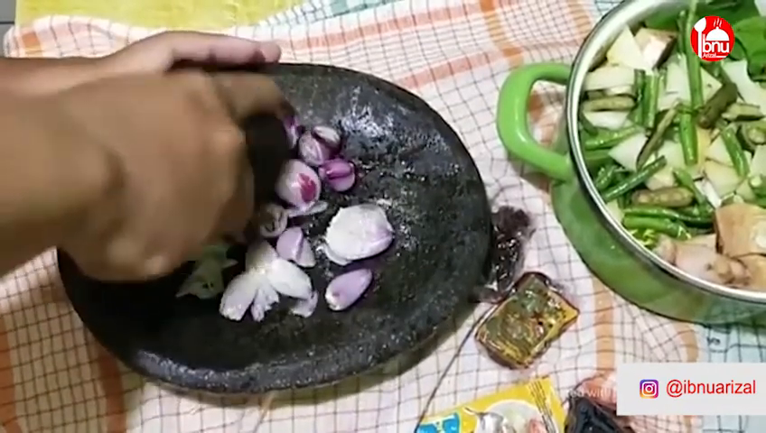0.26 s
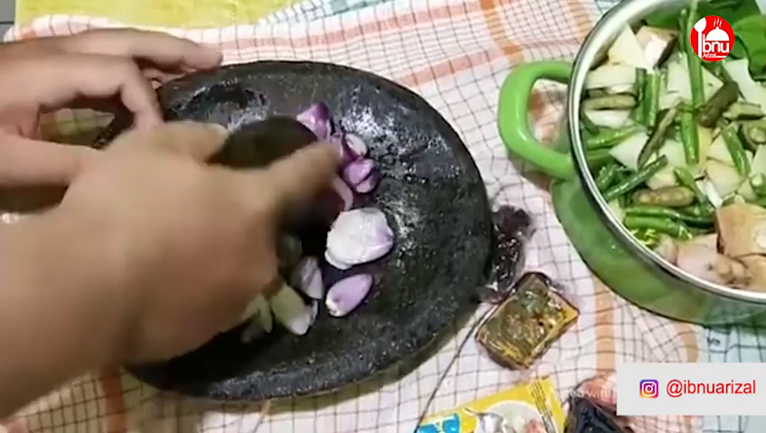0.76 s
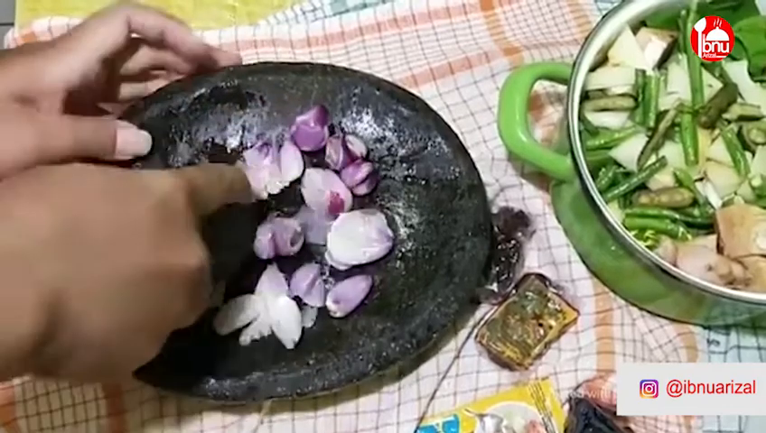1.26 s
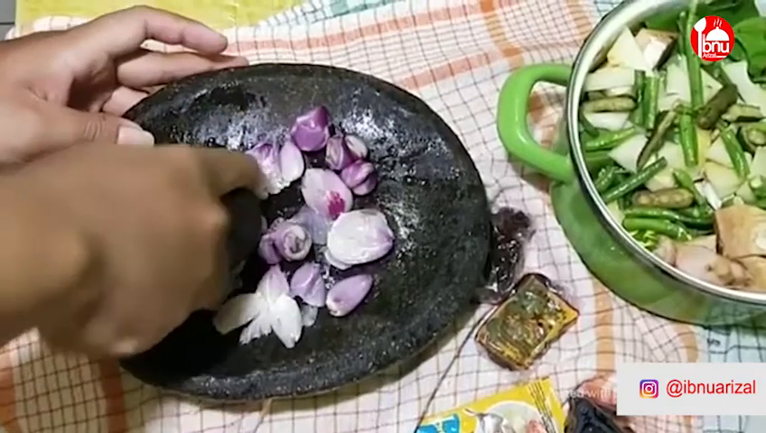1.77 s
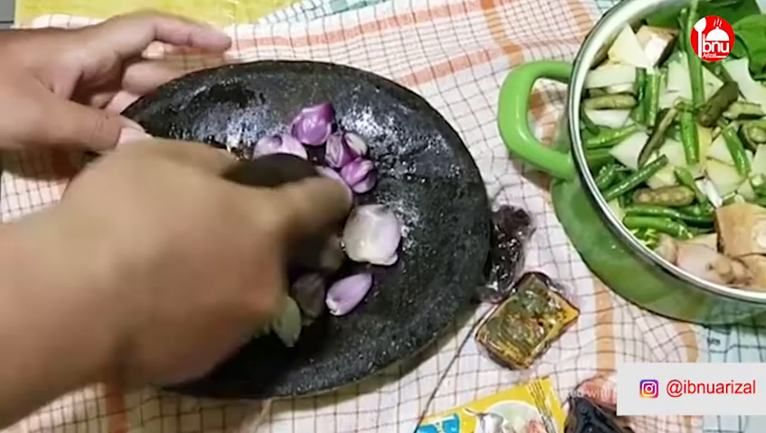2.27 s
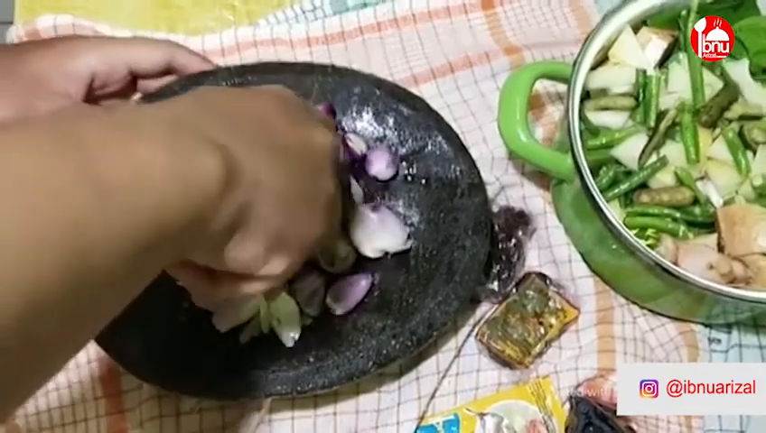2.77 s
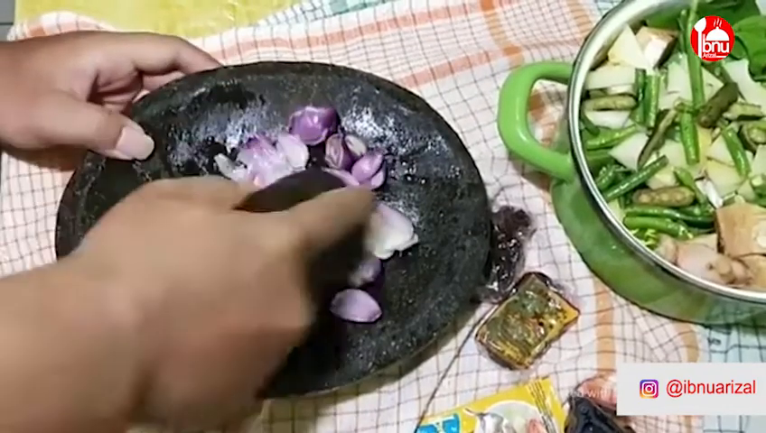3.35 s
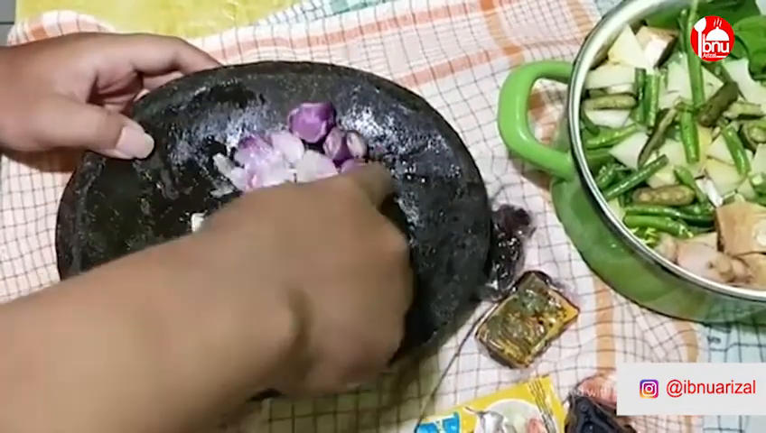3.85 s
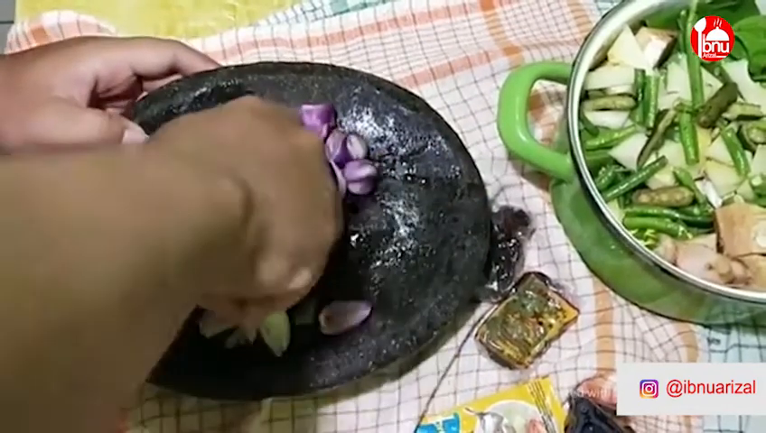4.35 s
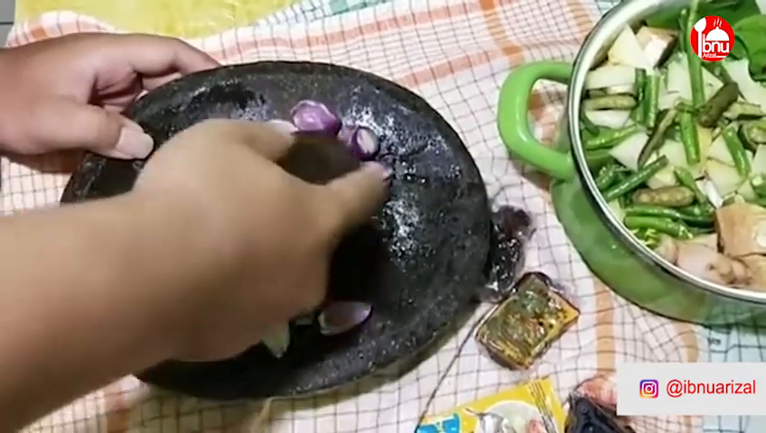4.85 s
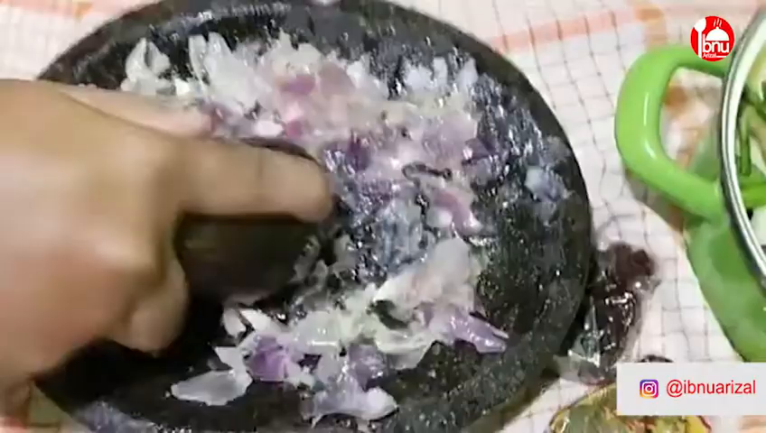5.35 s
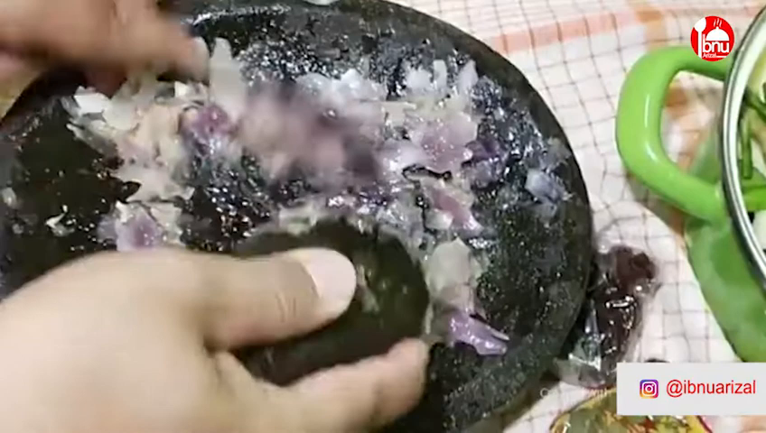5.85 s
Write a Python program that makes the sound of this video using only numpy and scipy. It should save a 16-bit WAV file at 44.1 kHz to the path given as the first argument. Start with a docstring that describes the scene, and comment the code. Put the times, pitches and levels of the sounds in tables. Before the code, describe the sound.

Five uneven pestle strokes, heard near the mortar in a small, slightly echoing room with somewhat dulled treble. Shallots snap and crackle most densely at the start, stone rubs on stone, and low thumps shake the table. The third stroke squeaks and bursts sharply, followed by a lone bright knock; the fourth ends in a juicy crack. The last is a rough scrape with thin bird chirps and a spoon gathering pulp.

```python
"""A hand crushes shallots with a stone pestle in a shallow stone mortar on a cloth-covered table.
Five strokes follow one another in a quiet, softly humming kitchen: bulbs crackle, split and now and then
squeak (shaped noise), the pestle knocks (ringing modes) and drags (streams of tiny slips), and the table
booms (low sine swells). In the last stroke a far bird chirps (sliding sines), the sound cuts out for a moment,
and a spoon scrapes the pulp together (slips that ring its modes)."""
import sys
import numpy as np
from scipy import signal
from scipy.io import wavfile
from scipy.ndimage import uniform_filter1d

SR = 44100
rng = np.random.default_rng(int(sys.argv[2]) if len(sys.argv) > 2 else 0)


def persist_wave(psi):
    """Save psi, clipped to +-1, as 16-bit WAV."""
    counts = np.round(np.clip(psi, -1, 1) * 32767).astype(np.int16)
    wavfile.write(sys.argv[1], SR, np.atleast_2d(counts).T)


N = 269451

# ringing tones of mortar and table: (pitch_hz, relative_db, free_ring_t60_s)
BODY_MODES = [(97.6, -4.5, 0.35), (105.6, -11, 0.38), (140, -16, 0.55), (164, -18.5, 0.25),
              (224.7, 8, 0.12), (296.3, 4.5, 0.079), (323.7, -5.5, 0.18), (436, -0.5, 0.13),
              (497, -12.5, 0.2), (544, -21.5, 0.058), (654, -21.5, 0.12), (738, -7.5, 0.11),
              (819, -13, 0.1), (938, -11, 0.092), (1073, -12, 0.086), (1160, -9.5, 0.082),
              (1253, -20.5, 0.16), (1280, -15, 0.033), (1365, -31.5, 0.3), (1713, -19.5, 0.1),
              (1800, -16, 0.17), (1950, -26, 0.05), (2030, -20.5, 0.033), (2230, -24, 0.16),
              (2300, -26, 0.064), (2590, -29, 0.13)]
# ringing tones of the pestle: (pitch_hz, relative_db, ring_t60_s before the hand changes it)
PESTLE_MODES = [(3007, -2.5, 0.088), (3020, -30.5, 0.23), (5280, -3, 0.058), (6540, -12.5, 0.11),
                (7000, -14, 0.17)]


def gain_of(db):
    """Turn decibels into a multiplier."""
    return 10 ** (np.asarray(db) / 20)


def evened(x):
    """Scale x to an average strength (RMS) of one."""
    return x / np.sqrt(np.mean(x ** 2) + 1e-20)


def read(points, hz):
    """Look up a curve of (pitch_hz, value) points, straight between points on a log pitch scale."""
    f, value = np.transpose(points)
    return np.interp(np.log(hz + 1), np.log(f + 1), value)


def add(mix, s, sound):
    """Lay a sound into the mix at s seconds, cut off at the end of the mix."""
    part = mix[round(s * SR):][:len(sound)]
    part += sound[:len(part)]


def band(x, lo_hz, hi_hz):
    """Keep only the pitches between two limits, at a strength of one."""
    return evened(signal.sosfilt(signal.butter(3, [lo_hz, hi_hz], "band", fs=SR, output="sos"), x))


def steadied(x, lo_hz, hi_hz, hold_s):
    """A band of x with its beats evened out: the pitch wavers, the strength stays nearly steady."""
    x = band(x, lo_hz, hi_hz)
    power = abs(uniform_filter1d(x ** 2, round(hold_s * SR)))
    return band(x / np.sqrt(power + 0.046), lo_hz, hi_hz)


def colour(x, points):
    """Filter x to the given spectrum without sounding ahead of time (minimum phase)."""
    log_gain = np.log(gain_of(read(points, abs(np.fft.fftfreq(4096, 1 / SR)))))
    taps = np.fft.ifft(np.exp(np.conj(signal.hilbert(log_gain)))).real
    return signal.oaconvolve(x, taps[:2048])[:len(x)]


def stroke(column, shares=None):
    """Loudness curve of one column of the strokes, silent between them, each scaled by its share."""
    # five strokes of the hand, each a list of (time_s, crunch_of_flesh_db, drag_of_pestle_db,
    # load_that_shakes_mortar_and_table_db), all before the shares
    stroke_rows = [
        [(0.0, -75, -75, -90), (0.142, -62, -66.5, -59.5), (0.222, -60.5, -65.5, -67), (0.258, -66, -81, -64),
         (0.27, -55, -60, -57.5), (0.386, -45.5, -63, -56.5), (0.408, -56, -58, -47.5), (0.48, -55, -58, -62),
         (0.532, -49.5, -56, -55.5), (0.706, -59.5, -56.5, -54), (0.934, -71.5, -82, -78.5),
         (1.0, -102, -77, -97)],
        [(1.33, -79.5, -75, -76), (1.38, -78, -68, -71), (1.426, -75, -56.5, -58), (1.46, -69, -58, -60),
         (1.57, -70.5, -67, -51), (1.704, -66.5, -73, -65), (1.81, -69, -49.5, -45.5), (1.918, -60, -62, -64),
         (1.95, -52, -54.5, -52.5), (2.056, -64.5, -75, -70.5), (2.112, -49, -61, -63), (2.122, -66, -48, -44),
         (2.424, -79.5, -73, -73.5), (2.45, -103, -76, -76)],
        [(2.65, -87, -79, -61), (2.66, -94, -100, -88), (2.77, -69, -62.5, -68), (2.84, -79.5, -68.5, -80),
         (2.918, -66.5, -68, -61.5), (3.004, -71.5, -78, -81), (3.016, -64, -62, -68), (3.112, -64, -91, -72),
         (3.162, -51, -49, -39), (3.354, -86, -67.5, -63), (3.388, -73, -111, -60.5), (3.55, -91, -101, -109)],
        [(4.2, -99, -85, -79), (4.214, -102, -98, -89), (4.266, -70, -86, -66), (4.292, -76, -76, -66),
         (4.304, -75, -53, -49.5), (4.35, -73, -50.5, -50), (4.435, -70, -57.5, -55.5), (4.47, -61, -63, -57),
         (4.566, -61.5, -73, -63), (4.582, -48, -75, -59), (4.618, -64, -62.5, -49), (4.672, -73, -48.5, -41),
         (4.85, -64, -82, -68), (4.958, -70, -74.5, -79), (5.076, -101, -77, -91), (5.1, -92.5, -99, -92)],
        [(5.3, -86.5, -86, -68), (5.382, -79.5, -76.5, -70), (5.552, -71, -53, -54.5), (5.566, -74, -44.5, -54),
         (5.6, -67, -41, -50), (5.63, -66.5, -36.5, -46), (5.676, -68.5, -53.5, -48.5), (5.778, -86, -62, -59),
         (5.906, -96, -69.5, -61.5), (5.938, -94, -70, -77), (5.97, -101, -72, -58), (6.036, -72, -70, -86),
         (6.11, -78, -67, -73)],
    ]
    t, out = np.arange(N) / SR, np.zeros(N)
    for k, rows in enumerate(stroke_rows):
        rows = np.transpose(rows)
        gain = gain_of(np.interp(t, rows[0], rows[column], left=-200, right=-200))
        out += gain * (1 if shares is None else shares[k])
    return out


def grit(per_s, spread_db, smooth):
    """Clicks of uneven size at random moments, over a share of smooth noise."""
    size = gain_of(spread_db * np.minimum(rng.exponential(1, N), 4)) * rng.standard_normal(N)
    happens = rng.random(N) < per_s / SR
    return evened(size * happens) + smooth * rng.standard_normal(N)


def ring(modes, hard_hz, rise_ms=1., place_db=0., steep=3., wobble_db=0.):
    """All modes after a blow; a soft blow wakes only the low ones, the place struck weights them."""
    t = np.arange(SR // 3) / SR
    hz, db, t60 = np.transpose(modes)[:, :, None]
    place, phase = rng.random((2, len(modes), 1))
    softness = np.sqrt(1 + (hz / hard_hz) ** (2 * steep))
    weight = gain_of(db + place_db * (place - .5)) / softness
    rise_s = rise_ms / 1000 * 300 / hz + 1e-4  # bass swells more slowly
    rise = 1 - np.exp(-t / rise_s)
    # uneven dying: one random value per 100 samples, smoothed, only above 500 Hz
    wobble = evened(uniform_filter1d(rng.standard_normal((len(modes), 221)), size=4))
    wobble = np.repeat(gain_of(wobble_db * wobble), 100, axis=1)[:, :len(t)]
    wobble = np.where(hz > 500, uniform_filter1d(wobble, size=100), 1)
    fade = gain_of(-60 * t / t60)
    return (weight * rise * wobble * fade * np.sin(2 * np.pi * (hz * t + phase))).sum(0)


def hush():
    """Kitchen hush: random short-time spectra whose narrow patches flicker like faint tones."""
    air_db = -69.5
    # spectrum of the hush: (pitch_hz, relative_db)
    air = [(18, -36), (30, -8), (70, -28.5), (106, 2.5), (178, -29), (210, -0.5), (259, -23), (368, -14),
           (2140, -25), (7570, -37), (8120, -44.5), (10600, -70.5), (17900, -120)]
    frames, hz = N // 256 + 5, np.fft.rfftfreq(1024, 1 / SR)
    a, b, patches = rng.standard_normal((frames, 513, 3)).T
    patches = uniform_filter1d(patches, size=3, axis=0)  # across pitch
    patches = evened(uniform_filter1d(patches, size=12, axis=1))  # across time
    spectra = (a + 1j * b) * gain_of(read(air, hz)[:, None] + 3.5 * patches)
    noise = signal.istft(spectra, nperseg=1024, noverlap=768)[1][:N]
    return gain_of(air_db) * band(noise, 30, 22000)


def hum():
    """A wavering low hum: noise squeezed into narrow bands, with its strength steadied."""
    # bands of the hum: (centre_hz, width_hz, level_db)
    hum_bands = [(106.25, 5.7, -71.5), (214.4, 19, -78), (397, 34, -87), (808, 12, -88)]
    out = np.zeros(N)
    for hz, width, db in hum_bands:
        noise = rng.standard_normal(N)
        out += gain_of(db) * steadied(noise, hz - width / 2, hz + width / 2, 0.048)
    return out


def kitchen(x):
    """Echoes of the room: sparse taps of random sign, each band dying at its own speed."""
    # how long the room rings: (pitch_hz, t60_s)
    room_t60 = [(100, 0.31), (1000, 0.22), (8000, 0.25)]
    taps, starts = np.zeros(SR // 2), np.arange(200, SR // 2 - 20, 20)
    places = starts + rng.integers(0, 20, len(starts))
    taps[places] = rng.choice([-1., 1.], len(starts))
    hz, t, z = signal.stft(taps, SR, nperseg=256)
    fade = gain_of(-60 * t / read(room_t60, hz)[:, None])
    tail = signal.istft(z * fade, SR, nperseg=256)[1]
    return signal.fftconvolve(x, tail / np.linalg.norm(tail))[:N]


def bird():
    """A far bird: thin whistles that slide up and level off."""
    # calls: (start_s, length_s, start_hz, end_hz that the slide nears, level_db)
    chirps = [(5.347, 0.035, 6500, 7400, -73), (5.397, 0.065, 6530, 7500, -68),
              (6.045, 0.049, 6800, 7300, -70)]
    out = np.zeros(N)
    for s, length, from_hz, to_hz, db in chirps:
        u = np.linspace(0, 1, round(length * SR))
        hz = to_hz + (from_hz - to_hz) * np.exp(-3.5 * u)
        swell = np.sin(np.pi * u) ** 0.62
        add(out, s, gain_of(db) * swell * np.sin(2 * np.pi * np.cumsum(hz) / SR))
    return out


def spoon():
    """A spoon scrapes the pulp together: light slips along the stone wake now one mode, now another."""
    # ringing tones of the spoon: (pitch_hz, relative_db, ring_t60_s)
    spoon_modes = [(942, 9, 0.057), (1750, 2, .06), (1806, 10.5, 0.053), (2490, 2.5, 0.095),
                   (2620, 2, 0.067), (3180, -1, 0.018)]
    # loudness of the scrape: (time_s, level_db)
    scoop = [(5.7, -90), (5.77, -77), (5.9, -68.5), (6.02, -73), (6.11, -80)]
    t, out, slips = np.arange(N) / SR, np.zeros(N), grit(400, 4.5, 0.59)
    for mode in spoon_modes:
        touch = gain_of(3.3 * evened(uniform_filter1d(rng.standard_normal(N), size=2000)))
        out += signal.oaconvolve(touch * slips, ring([mode], SR))[:N]
    level_db = np.interp(t, *np.transpose(scoop), left=-200)
    return gain_of(level_db) * evened(out)


def thumps():
    """Weight lands and the table top bobs at a pitch set by the load on it."""
    # weight dropped on the table: (start_s, peak_db, pitch_hz, rise_ms, t60_s)
    thump_rows = [(0.364, -44, 122.6, 11, 0.15), (1.382, -30.5, 90.5, 20, 0.18),
                  (1.515, -36.5, 116, 7.6, 0.087), (2.123, -36.5, 108, 6.4, 0.15),
                  (2.214, -48, 128, 12, 0.21), (2.701, -61.5, 74.6, 6, 0.24),
                  (3.164, -39.5, 108, 8.4, 0.28), (3.874, -35, 101.3, 12, 0.099),
                  (4.248, -50.5, 76, 10, 0.23), (4.658, -63, 118, 4.7, 0.33), (5.456, -46.5, 120, 17, 0.15),
                  (5.592, -34.5, 119, 8, 0.087), (5.689, -41.5, 130, 9.9, 0.2)]
    out, t = np.zeros(N), np.arange(SR // 2) / SR
    for s, db, hz, rise_ms, t60 in thump_rows:
        shape = (1 - np.exp(-t * 1000 / rise_ms)) ** 2 * gain_of(-60 * t / t60)
        add(out, s, gain_of(db) * shape / shape.max() * np.sin(2 * np.pi * hz * t))
    return out


def dragging():
    """Fine slips scrape dully through pulp, brightly on bare stone; duller jolts shake mortar and table."""
    held_share, grip = 0.52, .2  # shares of ring time left: mortar under the pestle, pestle in the hand
    rock_db = -3.5  # part of the load that rocks the table
    # sound of the drag through pulp: (pitch_hz, relative_db)
    pulp = [(300, -19), (600, 1), (850, 2), (1300, -10.5), (2500, -32.5), (6000, -46.5)]
    # sound of the drag on bare stone: (pitch_hz, relative_db)
    stone = [(400, -31), (800, 5.5), (1100, 2), (1700, 1), (2300, -1.5), (2800, -12), (3500, -34.5),
             (9000, -38.5)]
    # per stroke: share of bare stone under the pestle (0-1)
    bare_share = [0.66, 0.32, 0.35, 0.23, 0.57]
    # per stroke, how much the dragged pestle rings: (low_modes_db, high_modes_db)
    sing_db = [(-11, -17), (-20, -18), (-18, -16), (-24, -22), (-11, -17.5)]
    # per stroke: part of the load that shifts the mortar on the cloth (db)
    shift_db = [-3, -5, -5, -3, -8]
    # per stroke: part of the load that drives the strongest mode of the mortar (db)
    roll_db = [1, -1.5, -6, -7, -7]

    held = np.multiply(BODY_MODES, [1, 1, held_share])
    bare = np.array(bare_share)
    body = ring(held, 3900)
    slips = grit(1800, 2.2, 1.1)
    # part of the scrape is heard through the mortar
    drive = slips + 0.47 * band(signal.oaconvolve(slips, body)[:N], 450, 4500)
    scrape = stroke(2, 1 - bare) * evened(colour(drive, pulp))
    scrape += stroke(2, bare) * evened(colour(drive, stone))

    gripped = np.multiply(PESTLE_MODES, [1, 1, grip])
    low_sing = evened(signal.oaconvolve(slips, ring(gripped[:2], SR))[:N])
    high_sing = evened(signal.oaconvolve(slips, ring(gripped[2:], SR))[:N])
    low_share, high_share = gain_of(sing_db).T
    scrape += stroke(2, bare * low_share) * low_sing
    scrape += stroke(2, bare * high_share) * high_sing

    jolts = signal.oaconvolve(grit(300, 4.9, 0.66), ring(held, 380))[:N]
    shifting = stroke(3, gain_of(shift_db)) * steadied(jolts, 272, 580, 0.08)
    rocking = stroke(3) * gain_of(rock_db) * steadied(jolts, 65.4, 163.0, 0.03)
    rolling = stroke(3, gain_of(roll_db)) * steadied(jolts, 177.0, 256.3, 0.13)
    return scrape + rolling + shifting + rocking


def crushing():
    """Cells burst in a dense crackle; splits, squeaks and puffs each add a noise burst, sharp or slow."""
    pop_db = 7  # the first instant of a burst is louder
    rise_share, tearing_db = 0.021, 2  # a burst opens in this share of its t60 and is uneven
    # splits, and a few faint squeaks, scrapes and puffs:
    # (start_s, peak_db, resonance_centre_hz, resonance_against_hiss_db, t60_s)
    burst_rows = [(0.063, -51, 2570, -13, 0.044), (0.127, -41.5, 4230, -15, 0.12),
                  (0.151, -33, 4670, -4.5, 0.021), (0.2717, -28.5, 3860, -0.5, 0.1),
                  (0.2828, -39.5, 4160, -12, 0.24), (0.3344, -33.5, 4030, -2.5, 0.13),
                  (0.362, -38, 2100, -9, 0.37), (0.395, -32.5, 4560, -7.5, 0.1),
                  (0.4077, -26.5, 4340, -8.5, 0.059), (0.4358, -37.5, 1810, -10.5, 0.29),
                  (0.5013, -35.5, 4370, 5, 0.15), (0.538, -42, 2140, 11, 0.03),
                  (0.5645, -29, 4250, -36, 0.049), (0.61, -34, 1240, -10.5, 0.33),
                  (1.3836, -52, 4100, -18, 0.082), (1.5168, -42.5, 3820, -4, 0.13),
                  (1.5742, -41.5, 4230, 6, 0.11), (1.7565, -30.5, 3980, -9, 0.14),
                  (1.9348, -33, 4080, 0, 0.1), (1.9774, -38.5, 4400, -1, 0.054),
                  (2.067, -46, 4800, 10, 0.47), (2.168, -49.5, 2000, 20, 0.057),
                  (2.211, -48.5, 4200, -3, 0.36), (2.8663, -53.5, 2800, -3, 0.22),
                  (2.9063, -55, 2980, -6, 0.045), (3.045, -43, 5560, 33, 0.043),
                  (3.123, -38.5, 5330, 13, 0.53), (3.1418, -31, 2540, 12, 0.031),
                  (3.159, -44, 1496, 2, 0.042), (3.1632, -22, 2640, -7.5, 0.035),
                  (3.166, -29, 2570, -12, 0.033), (4.2971, -52, 1160, -3, 0.25),
                  (4.402, -52.5, 4640, 14, 0.082), (4.4485, -46.5, 4070, -3, 0.11),
                  (4.462, -40, 3830, 3.5, 0.22), (4.5532, -50, 3920, -3, 0.079),
                  (4.5793, -30.5, 1500, -7, 0.12), (4.5889, -26, 2800, -10.5, 0.16),
                  (4.6166, -33, 3000, 0, 0.12), (4.63, -33, 1900, -4, .3), (4.6635, -30, 2600, -3, 0.06),
                  (4.6675, -19, 3800, -4, 0.05), (4.689, -35, 1700, 0, 0.2), (4.873, -52, 4800, 4, 0.32),
                  (4.899, -54.5, 3100, 11, 0.14), (5.47, -45.5, 5070, -0.5, 0.12),
                  (5.493, -50.5, 4800, 26, 0.073), (5.668, -46.5, 7060, -13, 0.13),
                  (5.706, -54, 7300, -3, 0.08)]
    # hiss of breaking flesh: (pitch_hz, relative_db)
    crunch = [(410, -25), (700, -14), (972, -21), (1340, -12.5), (1560, -22), (2680, -6.5), (3230, -10),
              (3840, -3), (5070, -5), (5970, -7), (6890, 6.5), (7560, 3.5), (8120, -20.5), (10600, -55),
              (17900, -120)]
    out = stroke(1) * evened(colour(grit(2000, 2.5, 0.8), crunch))
    t = np.arange(4000) / SR
    for s, db, hz, resonance_db, t60 in burst_rows:
        noise = rng.standard_normal(4000)
        tear = gain_of(tearing_db * evened(uniform_filter1d(rng.standard_normal(4000), size=90)))
        resonance = signal.lfilter(*signal.iirpeak(hz, 3.5, SR), noise)
        burst = evened(colour(noise, crunch)) + gain_of(resonance_db) * evened(resonance)
        opening = np.minimum(t / (rise_share * t60), 1)
        fade = gain_of(pop_db * np.exp(-t / 0.0013) - 60 * t / t60)
        burst = burst * fade * opening * tear
        add(out, s, gain_of(db) * burst / abs(burst).max())
    return out


def knocks():
    """A short clack of contact, then mortar and table ring and the pestle chatters; brief contact is bright."""
    bass_rise_ms = 11  # swell of a 300 Hz mode, longer below and shorter above
    place_db, wobble_db = 5, 6  # the place struck favours some modes; hand and cloth make them die unevenly
    thud_db, thud_t60_s = -17, 0.21  # dull scatter of the blow under the ring, before the hand shortens it
    clack_rise_ms, settle_s = 1.2, .01  # the clack opens; the pestle chatters against the stone
    rattle_db, pestle_soft_hz = -19.5, 3600  # chatter against pestle ring; the ring weakens above this
    # pestle meets stone: (start_s, peak_db, contact_ms, clack_against_ring_db, clack_hz, clack_t60_s,
    # second_clack_hz, second_against_first_db, pestle_against_ring_db,
    # share of the free ring time left by the pressing hand)
    knock_rows = [(0.503, -49, 0.45, 0, 1750, .02, 2600, -11, -30, 0.43),
                  (0.538, -56, 0.43, 2, 1800, .02, 2370, -12, -27, 0.25),
                  (0.594, -42.5, 1.1, -6, 1240, .03, 850, -6, -46, 0.98),
                  (0.693, -37.5, 0.44, -3, 1243, .025, 1820, -14, -53, 0.23),
                  (1.519, -44, 0.33, -4, 1950, .01, 1200, -1, -26, 0.17),
                  (1.57, -44.5, 0.54, -14, 890, .02, 1500, -14, -30, 0.77),
                  (1.756, -36.5, 1.4, -13.5, 460, .03, 1150, -1, -36, 0.68),
                  (1.813, -28.5, 1.3, -7, 795, 0.039, 1102, -8, -50, 0.26),
                  (1.938, -55.5, 0.34, -3, 1860, .02, 1200, -15, -7, 1),
                  (2.124, -36.5, 1.08, 2, 1087, 0.041, 1800, -9, -27, 0.32),
                  (3.166, -40, 1.5, -16, 795, .02, 1490, -4, -40, .9),
                  (3.872, -19.5, 0.56, 0, 1830, 0.0064, 900, -2, -25, 0.75),
                  (4.664, -36.5, 0.93, 4, 1370, 0.034, 1990, -3, -8, 0.41),
                  (5.563, -42, .5, -2, 1800, .03, 1110, -2, -24, 0.43),
                  (5.6, -41, 0.72, 0, 845, .04, 1270, -5, -32, 0.26),
                  (5.623, -33.5, 0.91, 2.5, 826, 0.042, 1670, -12, -20, 0.39)]
    out, t = np.zeros(N), np.arange(SR // 3) / SR
    for s, db, contact_ms, clack_db, clack_hz, clack_t60, second_hz, second_db, pestle_db, free in knock_rows:
        hard_hz = 1000 / contact_ms
        pressed = np.multiply(BODY_MODES, [1, 1, free])
        body = ring(pressed, hard_hz, bass_rise_ms, place_db, wobble_db=wobble_db)
        thud = band(rng.standard_normal(len(t)), 330, 1100 / contact_ms)
        thud = thud * gain_of(-60 * t / (thud_t60_s * free)) * (1 - np.exp(-t / 0.002))
        add(out, s, gain_of(db) * (body / abs(body).max() + gain_of(thud_db) * thud))

        turns = t[:400] * 1000 / contact_ms - 1.5  # time counted in contact lengths
        click = np.sin(2 * np.pi * 0.58 * turns) * np.exp(-(turns / 0.66) ** 2)
        add(out, s, gain_of(db + clack_db) * click / abs(click).max())

        clack = np.sin(2 * np.pi * clack_hz * t) + gain_of(second_db) * np.sin(2 * np.pi * second_hz * t)
        opening = 1 - np.exp(-(t * 1000 / clack_rise_ms) ** 2)
        clack = clack * opening * gain_of(-60 * t / clack_t60)
        add(out, s, gain_of(db + clack_db) * clack / abs(clack).max())

        pestle = ring(np.multiply(PESTLE_MODES, [1, 1, .25 + free]), pestle_soft_hz, wobble_db=1.)
        pestle = pestle * (1 - np.exp(-t / settle_s)) ** 2
        add(out, s, gain_of(db + pestle_db) * pestle / abs(pestle).max())

        chatter = rng.standard_normal(4000) * t[:4000] * np.exp(-t[:4000] / settle_s)
        add(out, s, gain_of(db + pestle_db + rattle_db) * chatter / abs(chatter).max())
    return out


def scene():
    """All layers together; the knocks, the crushing and the bird also feed the room's echoes."""
    hits, crush = knocks(), crushing() + bird()
    echoes = kitchen(gain_of(-6.0) * hits + gain_of(-7.0) * crush)
    return (hits + crush + thumps() + dragging() + echoes + spoon() + hush() + hum())[None]


def record(dry):
    """The sound cuts out for a moment, and a filter takes away the highest treble."""
    edge_hz = 8250  # upper limit of the treble
    # the moment of silence: (from_s, to_s)
    dropout = (5.452, 5.460)
    t = np.arange(N) / SR
    silent = (t > dropout[0]) & (t < dropout[1])
    on = uniform_filter1d(1. - silent, size=60)  # soft edges
    treble_limit = signal.firwin(301, edge_hz, window=("kaiser", 9), fs=SR)
    return signal.oaconvolve(dry * on, treble_limit[None], "same")


dry = scene()
out = record(dry)
persist_wave(out)
```